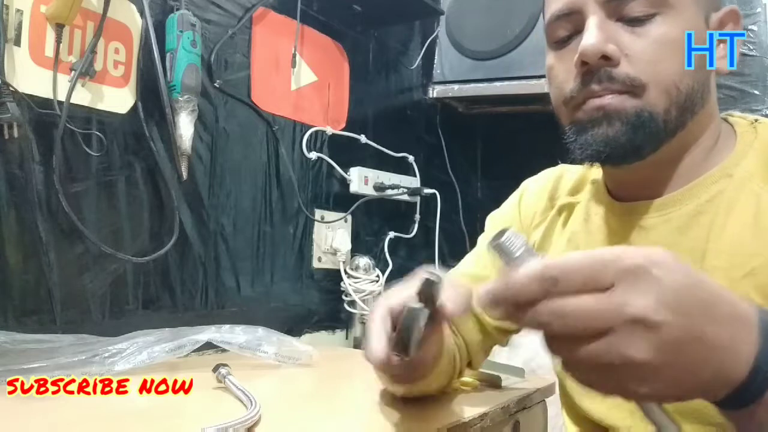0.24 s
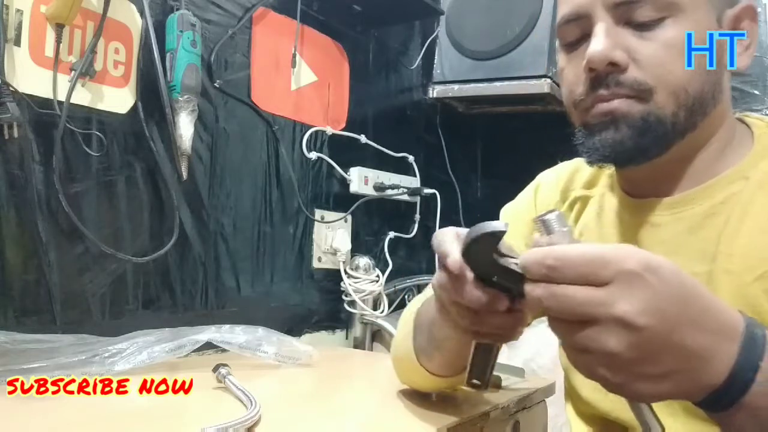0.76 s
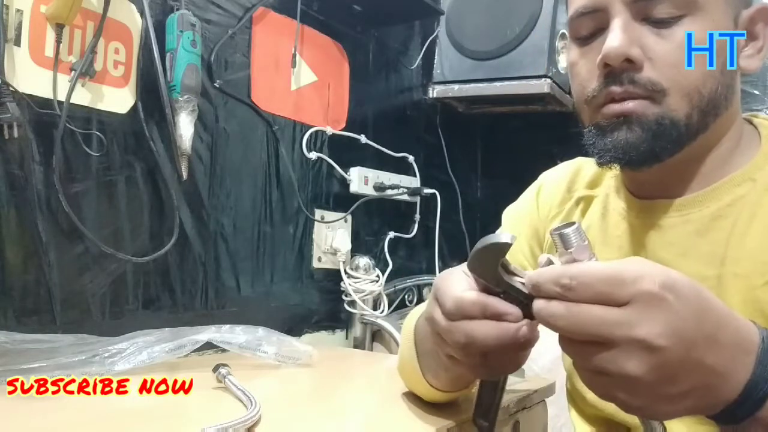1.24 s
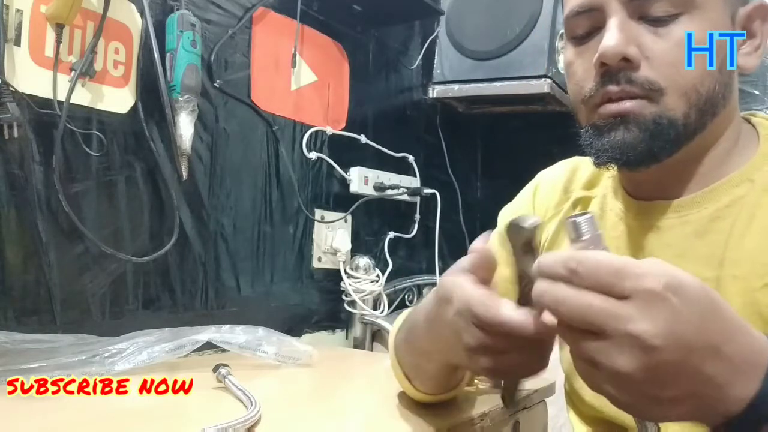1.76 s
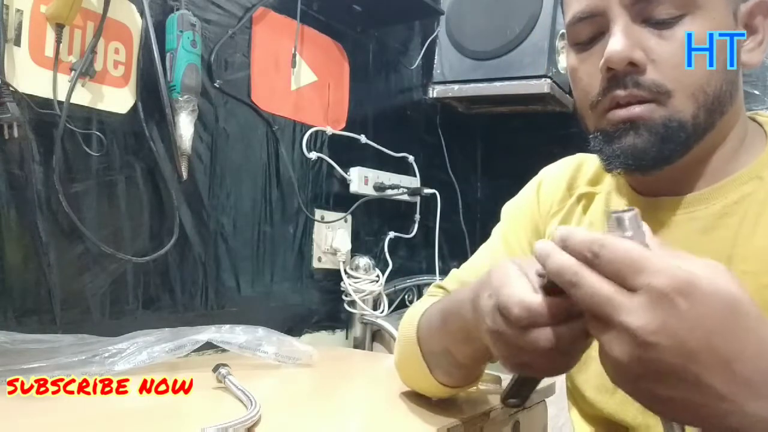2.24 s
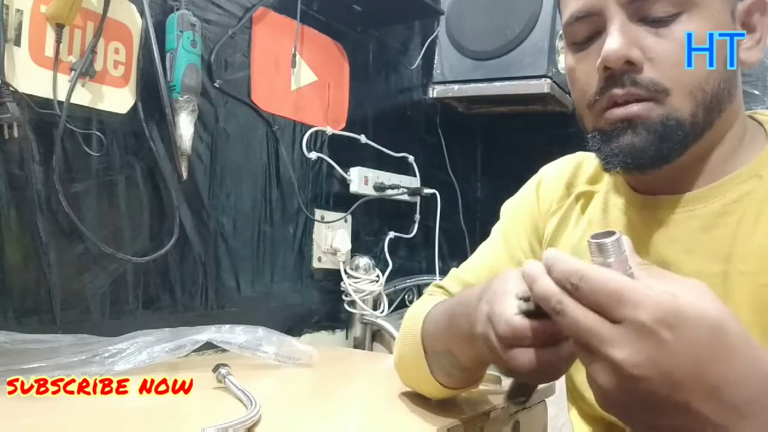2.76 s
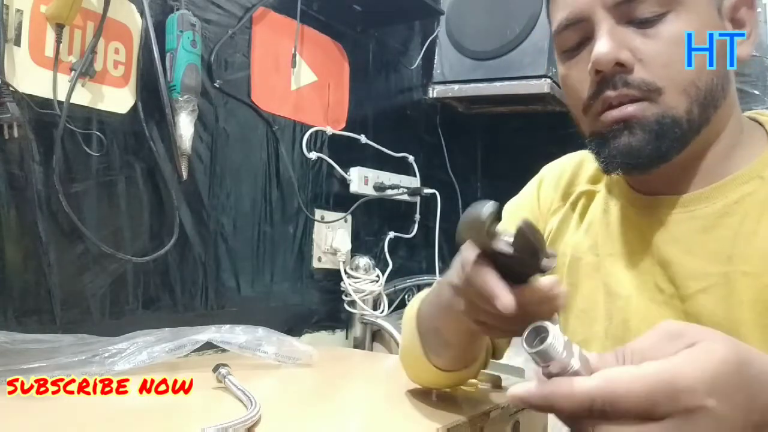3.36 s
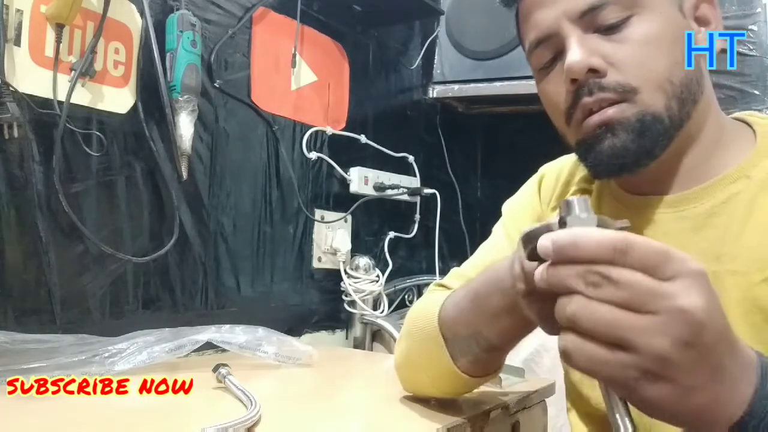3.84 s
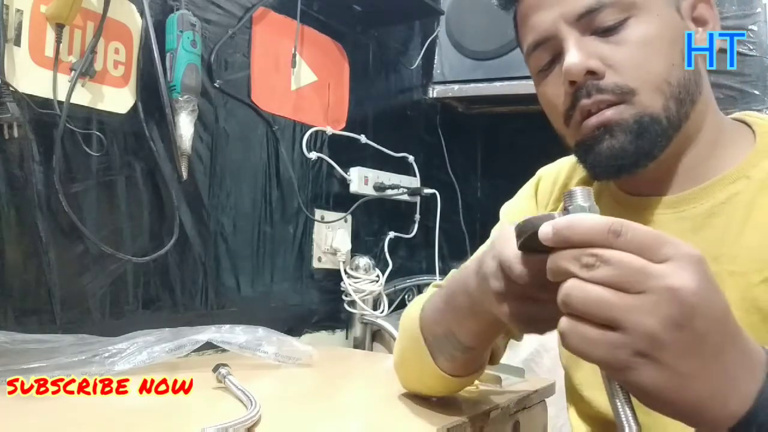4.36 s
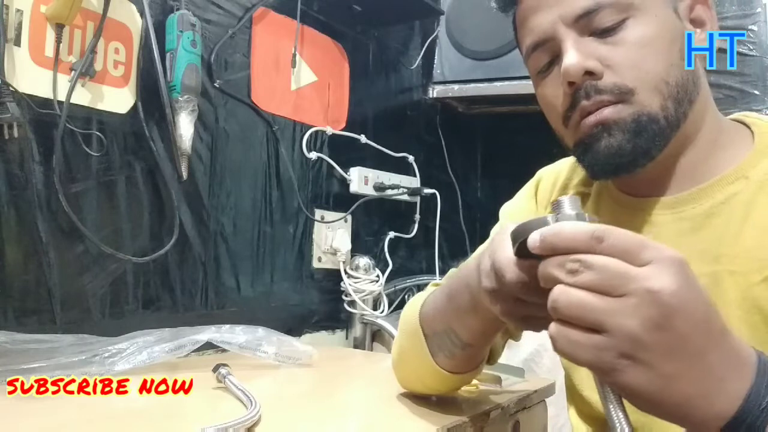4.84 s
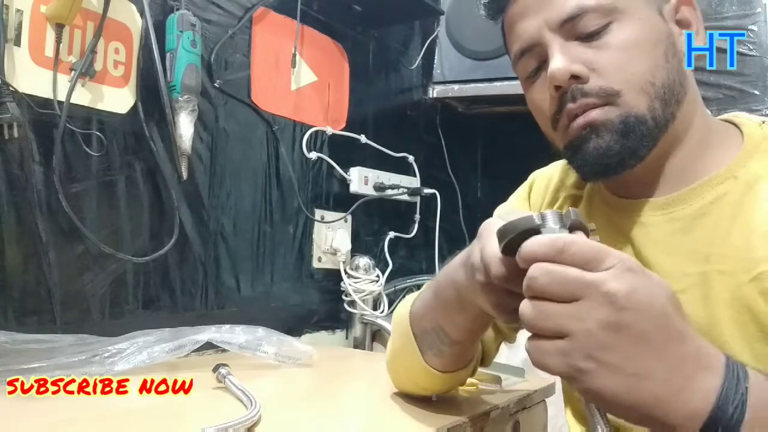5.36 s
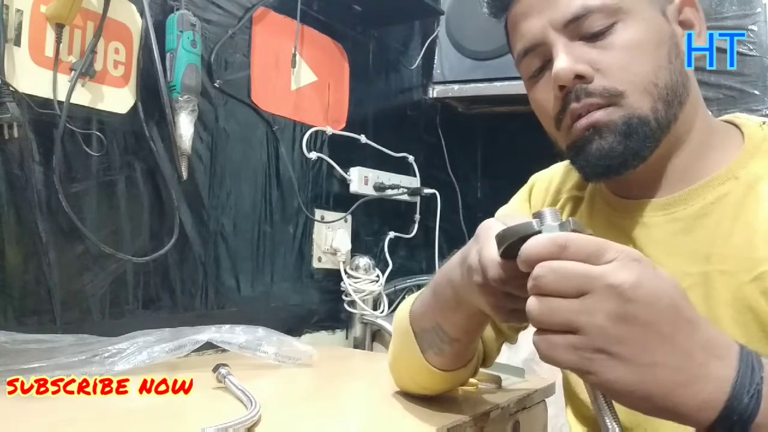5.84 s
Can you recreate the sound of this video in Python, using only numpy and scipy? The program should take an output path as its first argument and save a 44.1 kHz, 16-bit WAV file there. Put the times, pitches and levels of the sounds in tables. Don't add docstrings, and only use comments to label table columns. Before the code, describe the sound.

Close by, a steel wrench is fitted onto a metal pipe connector: a sharp crack at the start, a pause, scattered ticks and bright clinks, then a hard rattling knock after the middle. After a quieter stretch come short gritty scrapes and a final strong double clack. A small shed adds a brief reverb over faint motor hum and distant low rumble.

```python
import sys
import numpy as np
from scipy import signal
from scipy.fft import rfft, irfft, next_fast_len
from scipy.io import wavfile
from scipy.ndimage import minimum_filter1d

SR = 44100
rng = np.random.default_rng(int(sys.argv[2]) if len(sys.argv) > 2 else 0)


def invert_db(level):
    return 10 ** (np.asarray(level, dtype=float) / 20)


def inscribe(sig):
    pcm = np.round(np.clip(np.atleast_2d(sig).T, -1, 1) * 32767)
    wavfile.write(sys.argv[1], SR, pcm.astype(np.int16))


N = 268657
WORK_LAG = 7


def at_hz(points, hz):
    points_hz, points_db = np.transpose(points)
    return np.interp(np.log(hz), np.log(points_hz), points_db)


def in_time(rows):
    s, level_db = np.transpose(rows)
    return np.interp(np.arange(N) / SR, s, level_db)


def rms_one(x):
    return x / np.sqrt(np.mean(x ** 2) + 1e-20)


def bandpass(x, order, low_hz, high_hz):
    sos = signal.butter(order, [low_hz, high_hz], "band", fs=SR, output="sos")
    return signal.sosfilt(sos, x)


def drift(rate_hz):
    r = np.exp(-80 * np.pi * rate_hz / SR)
    slow = signal.lfilter([1], [1, -2 * r, r * r], rng.standard_normal(N // 40 + 2002))[2000:]
    return np.interp(np.arange(N) / 40, np.arange(len(slow)), rms_one(slow))


JAW_TOUCHES = [
    (2.3934, -46, -41, -63, 2.1),
    (2.9312, -52, -18, -33, 0.17),
    (3.619, -33, -55, -21.5, 1.2),
    (3.6263, -15.5, -24.5, 0, 1.46),
    (3.645, -40, -29, -45, 2.4),
    (3.679, -31.5, -24, -27, 2.2),
    (3.927, -50.5, -21, -66, 0.3),
    (4.2269, -46, -25, -31.5, 0.75),
    (5.3367, -46.5, -21, -24.5, 0.86),
]
HANDLE_TOUCHES = [(2.17, -61.5, -67, -57, 1.9), (2.1999, -48.5, -55, -53, 1.9),
                  (2.6589, -48, -40, -28.5, 0.71), (2.7217, -52, -51, -64, 0.86),
                  (2.7803, -50.5, -19, -34, 0.29), (3.174, -43.5, -39, -55, .6),
                  (5.0627, -38, -28, -28, 0.83), (5.1098, -46, -15, -31, 2.35),
                  (5.239, -50.5, -25, -50, 2.2), (5.5575, -56.5, -29, -53, 0.66),
                  (5.66, -51.5, -29, -50, 0.95), (5.685, -28.5, -13, -25, 0.72)]
NECK_TOUCHES = [
    (0.0188, -45, -4.5, -21, 0.33),
    (1.0536, -25, -22, -50, 0.94),
    (1.3987, -56, -18, -34, .6),
    (2.3277, -39.5, -11, -38, 0.87),
    (2.3689, -31.5, -14.5, -25.5, 0.73),
    (3.684, -28.5, -38, -21.5, .8),
    (3.695, -49.5, -23.5, -27, 0.66),
    (3.8445, -38.5, -19, -55, 3.7),
    (5.2659, -63, -36, -29.5, 0.49),
]
HEAD_TOUCHES = [
    (1.041, -21, -24, -32, 1.43),
    (1.1697, -35, -12.5, -43, 0.76),
    (2.168, -51, -31, -47, 1.2),
    (2.3745, -42, -13, -50, 1.7),
    (2.611, -44, -20, -32.5, 2.7),
    (3.048, -56, -45, -39, .3),
    (3.094, -30, -36, -41, 2),
    (3.867, -67, -43, -62, 0.68),
    (5.1708, -54, -16, -32, 1.2),
]
SLIDER_TOUCHES = [
    (0.7982, -31, -24, -19.5, 0.89),
    (1.1796, -26, -14, -48, 0.81),
    (1.2071, -35.5, -30, -57, 1.45),
    (3.0921, -31, -11, -22, 2.35),
    (3.6284, -27, -5, -31.5, 0.63),
    (3.6554, -47.5, -8, -19, 1),
    (3.9047, -27.5, -24, -60, 0.97),
    (5.7134, -29.5, 0.5, -21, 1.2),
]
HOSE_END_TOUCHES = [
    (4.3621, -48.5, -34, -26, 0.59),
    (4.3695, -33.5, -29.5, -30, 1.13),
    (4.3923, -35, -19, -40, 0.79),
]
THREAD_TOUCHES = [
    (2.8152, -42, -12.5, -32, 3.3),
    (5.699, -26, 5.5, -10, 0.61),
    (5.7313, -38, -9.5, -27, 0.75),
]
# (jaw ring [dB], handle bend [dB], handle twist [dB], head [dB], slider [dB])
TO_WRENCH = [
    (2.5, -15.5, -12.5, -16.5, -12),
    (-25, 4, -5.5, -24.5, -16),
    (-14.5, -67, -1.5, -10, -19),
    (-11, -14, -12, 0, -4),
    (-12.5, -37.5, -11.5, -12, 3.5),
    (-29, -5, -10, -12, -22),
    (-31, -1.5, -10, -4.5, 0.5),
]
# (hose end [dB], nut [dB], thread [dB], rim [dB])
TO_FITTING = [
    (-9, -16.5, -12.5, -11),
    (-21.5, -9, -17, -28.5),
    (-38.5, -10, -7, -22),
    (-11.5, -12, -5.5, -8.5),
    (-18.5, -33.5, -8.5, -11.5),
    (1.5, -11, -21, -25),
    (-5.5, -20, 0, -31),
]
# (centre [Hz], t60 [s])
LOOSE_PARTS = [
    (7530, 0.039),
    (3110, 0.064),
    (4738, 0.067),
    (6200, 0.1),
    (7000, 0.095),
    (3550, 0.077),
    (7160, 0.075),
]


def touches():
    places = [JAW_TOUCHES, HANDLE_TOUCHES, NECK_TOUCHES, HEAD_TOUCHES,
              SLIDER_TOUCHES, HOSE_END_TOUCHES, THREAD_TOUCHES]
    place = np.repeat(np.arange(len(places)), [len(rows) for rows in places])
    s, ring_db, crack_db, clatter_db, aim = np.transpose(np.concatenate(places))
    wrench_db = ring_db[:, None] + aim[:, None] * np.array(TO_WRENCH)[place]
    fitting_db = ring_db[:, None] + aim[:, None] * np.array(TO_FITTING)[place]
    loose_rows = np.column_stack([s, clatter_db, np.array(LOOSE_PARTS)[place]])
    return s, wrench_db, fitting_db, crack_db, loose_rows


def ring(clicks, hz, t60_s):
    r, w = invert_db(-60 / (max(t60_s, .01) * SR)), 2 * np.pi * hz / SR
    return signal.lfilter([0, np.sin(w)], [1, -2 * r * np.cos(w), r * r], clicks + 1e-18)


# (frequency [Hz], level [dB], t60 [s])
WRENCH_MODES = [
    [(9101, -3, .07), (9208, 3, .08), (9273, 4, .1), (9530, -3, .07), (9604, -3, .08)],
    [(2780, -7, .06), (2903, 1, .09), (3000, 2, .14), (3040, 0, .1)],
    [(4250, -7, .07), (4366, -6, .06), (4550, -1, .07), (4620, 4, .11), (4678, 3, .11)],
    [(5870, -8, .05), (6200, 6, .09), (6229, 3, .11)],
    [(3180, -10, .09), (6700, -9, .07), (6951, -2, .07), (7052, 5, .1), (7080, 5, .11)],
]
FITTING_MODES = [
    [(1470, -3, .05), (1970, 4, .09), (2330, 2, .07), (2520, -3, .06)],
    [(3710, -4, .08), (3950, -4, .08), (5150, 3, .08), (5260, 0, .08), (5420, -2, .08), (5700, 0, .05)],
    [(7645, 3, .08), (7845, -2, .06), (8510, -1, .08), (8614, 3, .08)],
    [(10070, -3, .06), (10930, 3, .1), (11570, -1, .06), (12380, 3, .09), (13022, -1, .06)],
]


def struck(body, at_s, levels_db, rub, rub_db, sustain):
    at = np.round(at_s * SR).astype(int)
    out = np.zeros((2, N))
    chance = rng.standard_normal((len(at), 72))
    modes = [(group, *mode) for group, rows in enumerate(body) for mode in rows]
    for k, (group, hz, level_db, t60_s) in enumerate(modes):
        clicks = invert_db(rub_db + level_db) * rub
        late = (abs(chance[:, 24 + k]) * .0006 * SR).astype(int)
        uneven_db = 2.5 * chance[:, k]
        sign = np.sign(chance[:, -1 - k])
        clicks[at + late] += invert_db(levels_db[:, group] + level_db + uneven_db) * sign
        tone = ring(clicks, hz, sustain * t60_s)
        lean_db = .7 + .6 * rng.standard_normal()
        lag = WORK_LAG + rng.integers(-4, 5)
        out += [invert_db(lean_db) * np.roll(tone, lag), invert_db(-lean_db) * tone]
    return out


# (frequency [Hz], density [dB per Hz])
CRACK_SPECTRUM = [(400, -25), (900, -41), (2000, -9), (3500, 2), (6000, -2), (9000, -6), (13000, -15)]


def cracks(at_s, peak_db, rub):
    out, t = np.zeros(N), np.arange(400) / SR
    bursts = rng.standard_normal((len(at_s), 400)) * .2 * np.exp(-t / .0012)
    bursts[:, 0] = 1
    for s, level_db, burst in zip(at_s, peak_db, bursts):
        out[round(s * SR):][:400] += invert_db(level_db - 3) * burst
    out = out + invert_db(-11.0) * rub
    hz = np.fft.rfftfreq(4096, 1 / SR) + 1
    cepstrum = irfft(np.log(invert_db(at_hz(CRACK_SPECTRUM, hz))))
    cepstrum[1:2048] *= 2
    cepstrum[2049:] = 0
    colour = irfft(np.exp(rfft(cepstrum)))[:1024]
    pulse = signal.fftconvolve(out, colour)[:N]
    return np.array([np.roll(pulse, WORK_LAG), invert_db(2.5) * pulse])


def clatter(rows, width, offset_db, ring_db, count):
    out, t = np.zeros((2, N + 8000)), np.arange(8000) / SR
    ring_t, ring_t60_s = t[:3000], .03
    grit = rng.standard_normal((len(rows), 3, 8000)) * rng.exponential(1, (len(rows), 1, 8000))
    lies = rng.uniform(-1, 1, (len(rows), count))
    for (s, level_db, hz, t60_s), (both, left, right), lie in zip(rows, grit, lies):
        burst = np.array([np.roll(both, WORK_LAG) + .7 * left, both + .7 * right])
        burst = burst * invert_db(-60 * t / max(t60_s, .005)) * (1 - np.exp(-t / .0006))
        pitches_hz = hz * width ** (np.linspace(-.6, .8, count) + lie / count)
        parts = np.sin(2 * np.pi * pitches_hz[:, None] * ring_t).sum(axis=0)
        parts = parts * invert_db(-60 * ring_t / ring_t60_s)
        rung = signal.fftconvolve(burst, [parts / np.linalg.norm(parts)], axes=1)[:, :8000]
        burst = burst + invert_db(ring_db) * rung
        edges_hz = [hz / width, min(hz * width, .45 * SR)]
        burst = signal.lfilter(*signal.butter(2, edges_hz, "band", fs=SR), burst)
        out[:, round(s * SR):][:, :8000] += invert_db(level_db + offset_db) * burst
    return out[:, :N]


# (time [s], level [dB], centre [Hz])
THUDS = [
    (1.041, -36.5, 673),
    (1.181, -38, 726),
    (3.093, -39, 644),
    (3.624, -29, 800),
    (3.679, -38.5, 800),
    (3.906, -46, 700),
    (4.373, -39.5, 590),
    (5.057, -44, 1147),
    (5.697, -30, 1200),
    (5.708, -29.5, 1183),
]


def hand_thuds():
    rows = [(*row, .076) for row in THUDS]
    return clatter(rows, width=2.9, offset_db=-1.0, ring_db=-39, count=6)


# (hardest [s], level [dB], swell [s], fade [s], centre [Hz])
RUBS = [
    (.51, -60, 0.049, 0.044, 7000),
    (.722, -61, 0.35, 0.082, 7000),
    (1.802, -56.5, 0.019, 0.41, 9600),
    (3.09, -45, 0.035, .005, 6200),
    (4.9, -49, 0.095, 0.041, 6060),
    (5.07, -40, 0.0044, 0.18, 3820),
    (5.172, -45.5, .015, 0.039, 3750),
    (5.275, -40.5, 0.11, 0.072, 4000),
    (5.56, -58, 0.022, 0.087, 4350),
]


def rubbing(per_s, spread_db, width):
    sizes = invert_db(spread_db * np.minimum(rng.exponential(1, N), 4))
    slips = sizes * rng.choice([-1, 1], N) * (rng.random(N) < per_s / SR)
    out, t = np.zeros(N), np.arange(N) / SR
    for s, level_db, swell_s, fade_s, hz in RUBS:
        away = np.maximum((s - t) / max(swell_s, .002), (t - s) / max(fade_s, .002))
        pressure_db = level_db - 33.5 * away
        slip_sound = bandpass(slips, 2, hz / width, min(hz * width, .45 * SR))
        out += invert_db(np.maximum(pressure_db, -200)) * rms_one(slip_sound)
    return out


# (frequency [Hz], t60 [s])
SHED_T60 = [(700, 0.6), (2000, 0.35), (5000, 0.32), (9000, 0.29), (13000, 0.24)]


def shed(x):
    t, edges_hz = np.arange(SR // 2) / SR, 300 * 2 ** np.arange(0, 6.1, .5)
    white = rng.standard_normal((2, len(t)))
    tail = 0
    for low, high in zip(edges_hz, edges_hz[1:]):
        decay = invert_db(-60 * t / at_hz(SHED_T60, np.sqrt(low * high)))
        tail = tail + bandpass(white, 2, low, high) * decay
    tail = tail * np.clip((t - .002) / 0.00086, 0, 1)
    tail = tail / np.sqrt(np.sum(tail ** 2, axis=1, keepdims=True))
    return signal.fftconvolve(x, tail, axes=1)[:, :N]


# (time [s], level [dB])
HUM_LOAD = [(0.0, -53), (1.02, -63), (1.46, -46.5), (1.91, -59), (1.98, -53.5), (2.49, -60.5),
            (2.73, -53.5), (2.9, -68.5), (2.93, -56.5), (3.36, -55.5), (3.53, -61.5), (4.66, -58.5),
            (4.75, -72), (4.92, -50.5), (5.02, -59.5), (6.09, -58.5)]


def motor_hum():
    hz = 125.5 + 4.0 * drift(2.9)
    level_db = in_time(HUM_LOAD) + 3.0 + 0.83 * drift(2.5)
    return np.sin(2 * np.pi * np.cumsum(hz) / SR) * invert_db(level_db)


# (time [s], level [dB])
RUMBLE = [
    (0.0, -62),
    (0.08, -45.5),
    (0.42, -62),
    (0.54, -57),
    (4.05, -55.5),
    (4.51, -48.5),
    (4.61, -58.5),
    (5.63, -50.5),
    (6.09, -52),
]


def traffic_rumble():
    level_db = in_time(RUMBLE) + 2.5 * drift(2.9)
    low = bandpass(rng.standard_normal((2, N)), 3, 45, 82)
    return rms_one(low[0] + 0.47 * low[1] * [[1], [-1]]) * invert_db(level_db - 4.0)


def stand_sway():
    return invert_db(-53.0) * rms_one(bandpass(rng.standard_normal(N), 3, 8, 22))


# (frequency [Hz], density [dB per Hz])
AIR_SPECTRUM = [(25, -42), (42, -6.5), (87, -6), (125, -13), (170, -11.5), (304, -16.5), (335, -16),
                (543, -13.5), (584, -15.5), (726, -15.5), (781, -16), (3090, -29), (10600, -35.5),
                (13500, -40)]
# (frequency [Hz], likeness [1])
PORT_LIKENESS = [(60, 0.93), (130, 0.95), (280, 0.98), (600, 0.31), (1300, 0.51), (2500, 0.043),
                 (5000, 0.053)]


def distant_air():
    size, lag = next_fast_len(N), 17
    hz = np.fft.rfftfreq(size, 1 / SR) + 1
    alike = np.clip(at_hz(PORT_LIKENESS, hz), 0, 1)
    shared, left, right = rfft(rng.standard_normal((3, size)))
    late = np.exp(-2j * np.pi * hz * lag / SR)
    ports = np.sqrt(alike) * shared * [np.ones_like(late), late]
    ports = ports + np.sqrt(1 - alike) * np.array([left, right])
    air = irfft(ports * invert_db(at_hz(AIR_SPECTRUM, hz)), size)[:, :N]
    air = rms_one(air) * invert_db(-53 + np.array([[1.0], [.1]]))
    far = signal.sosfilt(signal.butter(2, 2500, fs=SR, output="sos"), air)
    far_db = 4.5 - 0.77 * np.arange(N) / SR
    return air + (invert_db(far_db) - 1) * far


def scene():
    s, wrench_db, fitting_db, crack_db, loose_rows = touches()
    rub = rubbing(per_s=900, spread_db=3.5, width=1.8)
    rattle = clatter(loose_rows, width=2.2, offset_db=-23.0, ring_db=-1.0, count=22)
    shaken = rub + invert_db(8) * rattle[1]
    work = struck(WRENCH_MODES, s, wrench_db - 2.0, shaken, rub_db=-42, sustain=.75)
    work += struck(FITTING_MODES, s, fitting_db - 2.5, shaken, rub_db=-40, sustain=.7)
    work += rattle + hand_thuds()
    crack = cracks(s, crack_db, rub)
    reverb = invert_db(-4) * shed(work + invert_db(2.5) * crack)
    background = distant_air() + traffic_rumble() + motor_hum() + stand_sway()
    return work + invert_db(3.0) * crack + reverb + background


def handset_thinning(x, masked_db, tilt_db, faint_db, grain_db):
    frames = signal.stft(x, window="cosine", nperseg=2048)[2]
    bands = frames[:, :1024].reshape(2, 64, 16, -1)
    power = np.mean(abs(bands) ** 2, axis=(0, 2)) + 1e-20
    level_db = 10 * np.log10(power)
    band = np.maximum(np.arange(64), 7)
    loudest_db = -minimum_filter1d(-level_db[band], size=9, axis=0, origin=1)
    reach_db = masked_db - tilt_db * np.log2(band / 16)[:, None]
    reach_db = reach_db + 3.0 * rng.standard_normal(level_db.shape)
    usual_db = signal.medfilt(level_db, [9, 1])
    unmasked = level_db > loudest_db - reach_db
    stands_out = level_db > usual_db - faint_db
    busy = usual_db > np.median(level_db, axis=1, keepdims=True) + faint_db
    kept = unmasked & (stands_out | busy)
    kept[:9] = True
    grain = rng.standard_normal(bands.shape) + 1j * rng.standard_normal(bands.shape)
    bands = bands + invert_db(grain_db) * grain * np.sqrt(power)[:, None]
    bands = bands * np.where(kept, 1, .02)[:, None]
    frames[:, :1024] = bands.reshape(2, 1024, -1)
    return signal.istft(frames, window="cosine", nperseg=2048)[1][:, :N]


def low_pass(x):
    return signal.sosfilt(signal.butter(12, 14080, fs=SR, output="sos"), x)


def record(dry):
    cut = signal.sosfilt(signal.cheby2(16, 60, 13600, fs=SR, output="sos"), dry)
    thinned = handset_thinning(cut, masked_db=14.5, tilt_db=1.5, faint_db=1.3, grain_db=-27)
    return low_pass(np.clip(thinned, -1, 1))


dry = scene()
out = record(dry)
inscribe(out)
```